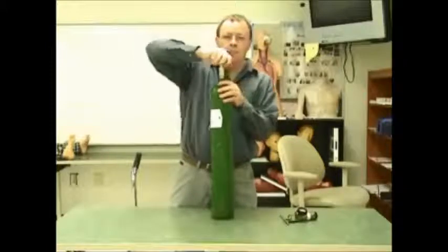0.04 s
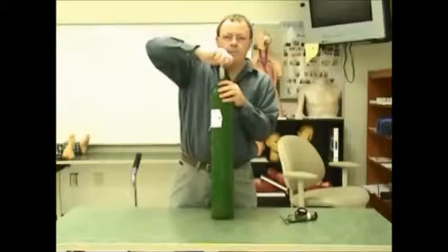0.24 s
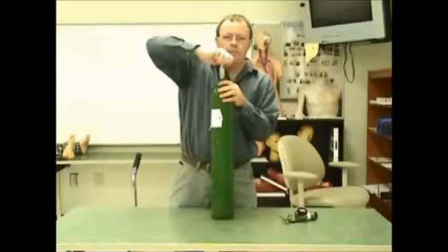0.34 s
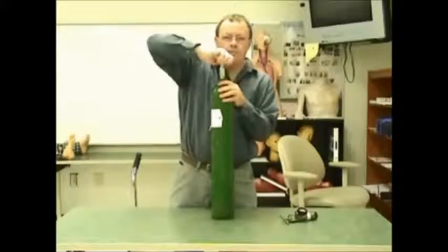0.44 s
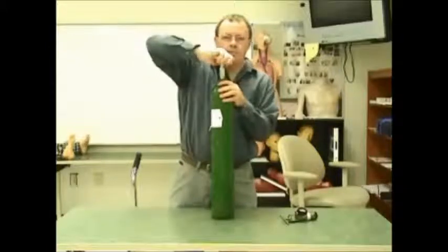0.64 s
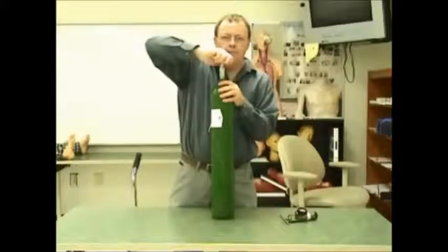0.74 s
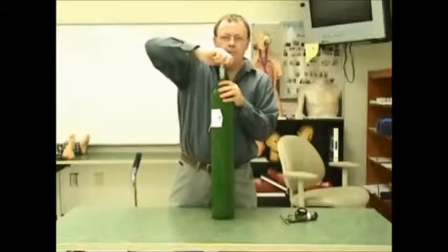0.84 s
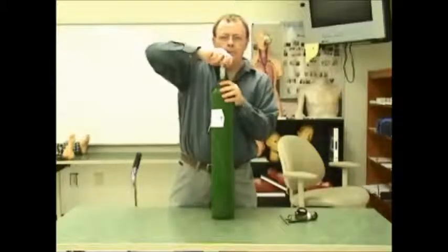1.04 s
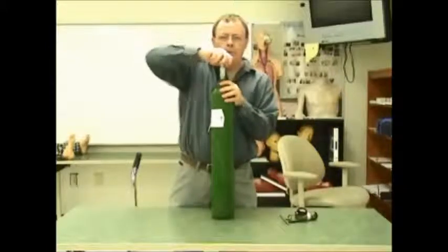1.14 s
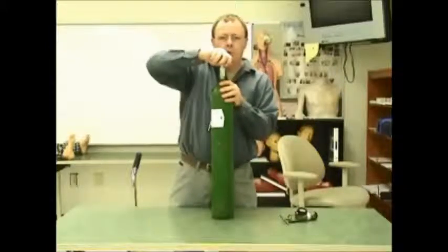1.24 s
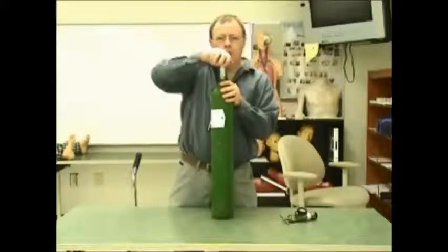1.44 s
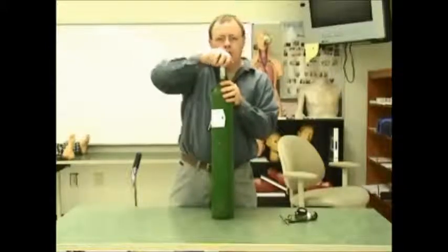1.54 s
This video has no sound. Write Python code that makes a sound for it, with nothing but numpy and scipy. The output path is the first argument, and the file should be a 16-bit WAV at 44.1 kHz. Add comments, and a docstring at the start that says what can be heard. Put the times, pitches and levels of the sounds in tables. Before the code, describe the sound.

A loud hiss of gas escapes from a cylinder for about a second, then stops.

```python
"""Gas cylinder in a classroom

A gas cylinder stands on a bench; its valve is opened for a second and shut again. The jet hisses
through narrow resonances of the outlet, briefly lower late in the burst; bench and walls throw it back.
A soft, hollow handling scuff follows the closing, over the low rumble and hum of the room."""
import sys
import numpy as np
from scipy import signal
from scipy.fft import rfft, irfft
from scipy.io import wavfile
from scipy.ndimage import uniform_filter1d

SR = 44100
rng = np.random.default_rng(int(sys.argv[2]) if len(sys.argv) > 2 else 0)


def materialize(psi):
    """Save the field psi as 16-bit PCM at rate SR to the path in sys.argv[1].

    A 1-D psi becomes a single channel; in a 2-D psi each row is a channel.
    """
    bounded = np.clip(np.atleast_2d(psi).T, -1, 1)
    quanta = np.round(bounded * 32767).astype(np.int16)
    wavfile.write(sys.argv[1], SR, quanta)


N = 70560
TIME_S, FREQ_HZ = np.arange(N) / SR, np.fft.rfftfreq(N, 1 / SR)


def amp(db):
    """Decibels to gain."""
    return 10 ** (np.asarray(db) / 20)


def unit_rms(x):
    """Scales to rms 1."""
    return x / np.sqrt(np.mean(x ** 2) + 1e-20)


def curve_at(table, hz):
    """Interpolates a table on a log-frequency axis."""
    table_hz, values = np.transpose(table)
    return np.interp(np.log(hz + 1), np.log(table_hz + 1), values)


def noise(spectrum_db):
    """Coloured noise, rms 1."""
    return unit_rms(irfft(rfft(rng.standard_normal(N)) * amp(spectrum_db), N))


def wobble(shape, span):
    """Random drift, rms 1, smoothed over span points per axis."""
    drift = rng.standard_normal(shape)
    for axis, points in enumerate(span):
        drift = uniform_filter1d(drift, points, axis)
    return unit_rms(drift)


# room rumble spectrum: freq_hz, relative_db
RUMBLE_SPECTRUM = [(15, -59.5), (25, -36), (54, -17), (130, -4.5), (332, -11), (480, -17), (678, -22.5),
                   (846, -29), (911, -22.5), (1060, -32), (1530, -34.5), (1690, -36), (9000, -52.5),
                   (11700, -99), (19800, -120)]
# ventilation hum: pitch_hz, level_db
HUM_TONES = [(118.4, -54), (161.5, -67)]

def ambience(rumble_db=-43, waver=0.24):
    """Steady room rumble and wavering ventilation hum."""
    hum = np.zeros(N)
    for pitch_hz, level_db in HUM_TONES:
        tone = np.sqrt(2) * np.sin(2 * np.pi * (pitch_hz * TIME_S + rng.random()))
        hum += amp(level_db) * tone * (1 + waver * wobble((N,), span=(4000,)))
    return hum + amp(rumble_db) * noise(curve_at(RUMBLE_SPECTRUM, FREQ_HZ))


# room reverberation: freq_hz, t60_s
ROOM_DECAY = [(150, 1), (700, 0.76), (2500, 0.57), (6000, 0.51), (11000, 0.21)]

def reverb_tail(rise_s):
    """Diffuse tail of energy 1; the treble dies first."""
    taps = rng.standard_normal(SR) * np.minimum(np.arange(SR) / SR / rise_s, 1)
    hz, frame_s, bands = signal.stft(taps, SR, nperseg=256)
    decay = amp(-60 * frame_s / curve_at(ROOM_DECAY, hz)[:, None])
    tail = signal.istft(bands * decay, SR, nperseg=256)[1]
    return tail / np.linalg.norm(tail)


def room(direct, wet_db, early_db=-20, early_s=0.02, echoes=12, tails=3, drift_per_s=4.99):
    """Direct sound, early reflections off bench and walls, and tails that drift into one another."""
    delays_s = (rng.random(echoes) + 0.1) * early_s
    taps = np.zeros(SR)
    taps[(delays_s * SR).astype(int)] = amp(early_db) * rng.choice([-1, 1], echoes) / np.sqrt(echoes)
    early = signal.fftconvolve(direct, taps)[:N]
    wet = np.zeros(N)
    for k in range(tails):
        crossfade = np.sqrt(2 / tails) * np.cos(np.pi * (drift_per_s * TIME_S + k / tails))
        wet += signal.fftconvolve(direct * crossfade, reverb_tail(early_s))[:N]
    return (direct + early + amp(wet_db) * wet) / np.sqrt(1 + amp(wet_db) ** 2)


# hollow resonances: centre_hz, half_width_hz, relative_db
HOLLOW_MODES = [(214, 50, -10), (305, 55, -6), (545, 70, -9), (720, 45, 0), (800, 94, -6), (1087, 41, -10)]

def scuff(start_s=1.155, rise_s=0.024, t60_s=0.21, rub_db=-31, ring_hz=718, ring_vs_rub_db=-2):
    """A short handling rub stirs low, hollow resonances, one of them a clear note."""
    age_s = np.maximum(TIME_S - start_s, 0)
    rub = np.zeros(N)
    for centre_hz, half_width_hz, relative_db in HOLLOW_MODES:
        detune = (FREQ_HZ - centre_hz) / half_width_hz
        rub += amp(relative_db) * noise(-40 * np.log10(np.hypot(1, detune)))
    ring = amp(ring_vs_rub_db) * np.sqrt(2) * np.sin(2 * np.pi * ring_hz * age_s)
    attack = np.minimum(age_s / rise_s, 1)
    decay = amp(-60 * np.maximum(age_s - rise_s, 0) / t60_s)
    return amp(rub_db) * attack * decay * (unit_rms(rub) + ring)


# flow through the valve: time_s, level_db
VALVE_FLOW = [(.13, -76.5), (.15, -57.5), (.19, -44), (.22, -30.5), (0.269, -22), (0.331, -15.5),
              (.38, -16), (.5, -16), (.78, -16), (.89, -14.5), (.95, -16.5), (1.055, -17), (1.068, -25.5),
              (1.11, -21.5), (1.16, -32), (1.311, -34.5), (1.37, -51), (1.449, -92)]
# turbulence spectrum: freq_hz, relative_db
JET_SPECTRUM = [(40, -16), (200, -24.5), (500, -16.5), (900, -14), (1600, -9.5), (2200, -6), (2700, -4),
                (3150, -7.5), (4000, -6.5), (5000, -2.5), (6500, 0.5), (7800, -1.5), (8900, -5), (9150, -6),
                (11800, -12.5)]
# narrow outlet resonances: centre_hz, width_hz, lift_db
OUTLET_MODES = [(2130, 50, 3.5), (2450, 60, 2.5), (2710, 90, 2.5), (4610, 30, 6), (5180, 45, 5),
                (5580, 45, 5), (5820, 28, 6), (6010, 25, 5), (6190, 25, 4), (6260, 35, 4), (6490, 70, 2),
                (6610, 35, 6), (6890, 40, 4), (7100, 40, 4), (7320, 38, 6), (7810, 35, 4), (7920, 22, 5),
                (8070, 35, 4), (8500, 27, 5), (8610, 30, 5), (8890, 40, 5)]
# thinner colour of a weak jet: freq_hz, change_db
WEAK_JET_COLOUR = [(500, 6), (1500, -0.5), (2700, -1.5), (4000, 1.5), (6400, -2.5), (9000, 2.5),
                   (11500, -4)]
# colour of the brief drop in pitch: freq_hz, change_db
SAG_COLOUR = [(1500, -1.5), (2400, -0.5), (2800, 3.5), (3300, 1.5), (4000, 2.5), (5500, 2), (6300, 0.5),
              (6900, -4.5), (7800, -5.5), (11000, -5)]

def gas_jet(thin_range_db=26.5, sag_s=0.857, sag_width_s=0.042, flutter_db=0.5, patch_db=0.6,
            treble_edge_hz=10300, treble_db_per_s=-7, treble_neutral_s=0.87):
    """Turbulence coloured by the outlet; level and colour follow the flow."""
    outlet_db = sum(lift_db / (1 + (2 * (FREQ_HZ - centre_hz) / width_hz) ** 2)
                    for centre_hz, width_hz, lift_db in OUTLET_MODES)
    turbulence = noise(curve_at(JET_SPECTRUM, FREQ_HZ) + outlet_db)
    hz, frame_s, bands = signal.stft(turbulence, SR, nperseg=512, noverlap=384)
    hz = hz[:, None]
    flow_s, flow_db = np.transpose(VALVE_FLOW)
    flow_loss_db = flow_db.max() - np.interp(frame_s, flow_s, flow_db)
    thin_db = curve_at(WEAK_JET_COLOUR, hz) * np.minimum(flow_loss_db / thin_range_db, 1)
    sag_db = curve_at(SAG_COLOUR, hz) * np.exp(-((frame_s - sag_s) / sag_width_s) ** 2)
    # the top treble slowly dulls
    treble_shelf = 1 / (1 + np.exp((treble_edge_hz - hz) / 500))
    treble_tilt_db = treble_db_per_s * (frame_s - treble_neutral_s) * treble_shelf
    churn_db = flutter_db * wobble(frame_s.shape, span=(4,))  # all bands together
    churn_db = churn_db + patch_db * wobble(bands.shape, span=(10, 14))  # time-frequency patches
    bands *= amp(thin_db + sag_db + treble_tilt_db + churn_db)
    hiss = signal.istft(bands, SR, nperseg=512, noverlap=384)[1][:N]
    return hiss * amp(np.interp(TIME_S, flow_s, flow_db))


def scene():
    """Jet and scuff in the room, over the ambience; both channels alike."""
    mono = room(gas_jet(), wet_db=-6.5) + room(scuff(), wet_db=-9.5) + ambience()
    return np.array([mono, mono])


def record(dry):
    """Steep low-pass band limit."""
    cutoff_hz = 11830
    lowpass = signal.firwin(901, cutoff_hz, window=("kaiser", 9), fs=SR)
    return signal.oaconvolve(dry, lowpass[None], "same")


dry = scene()
out = record(dry)
materialize(out)
```